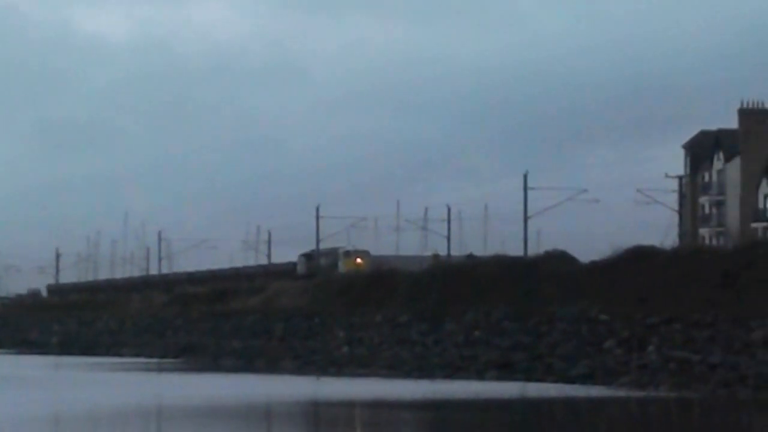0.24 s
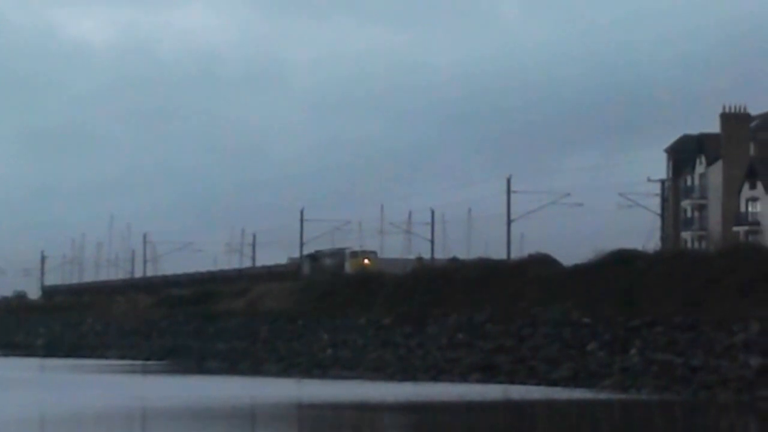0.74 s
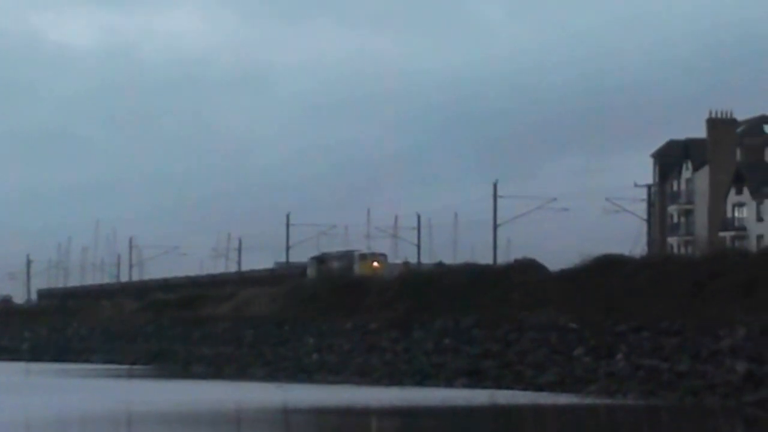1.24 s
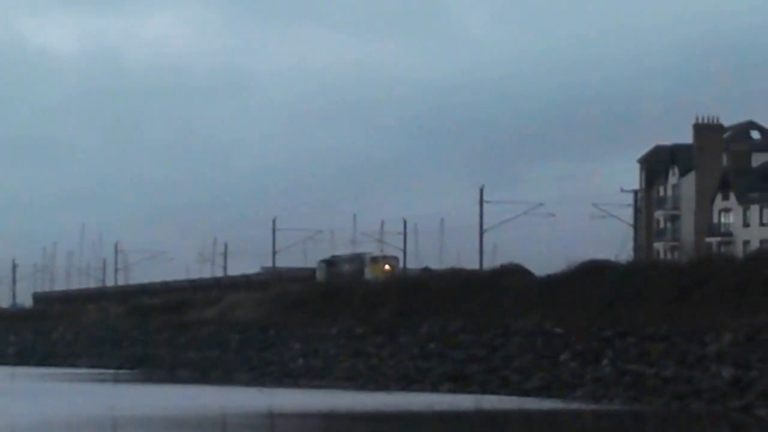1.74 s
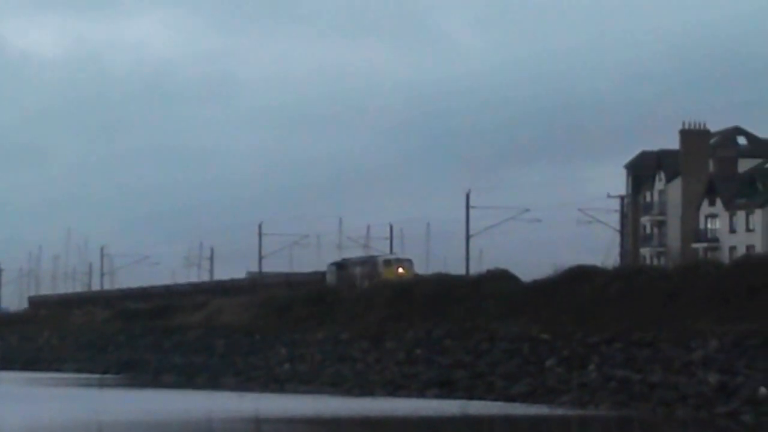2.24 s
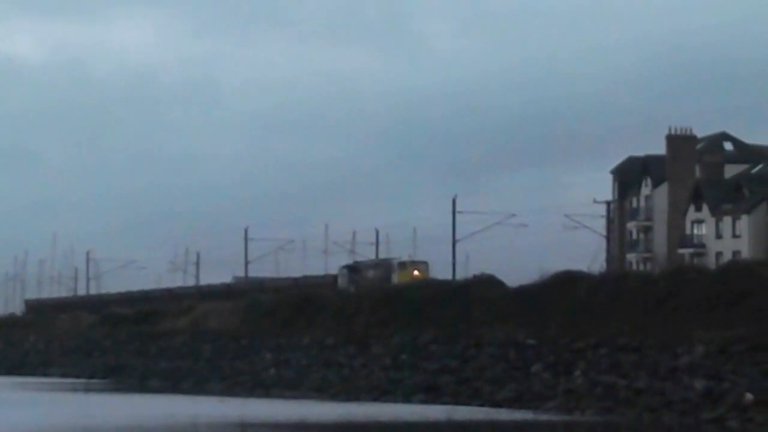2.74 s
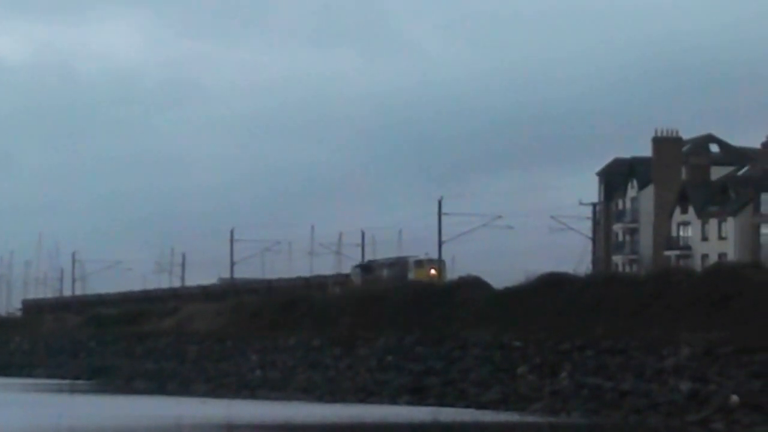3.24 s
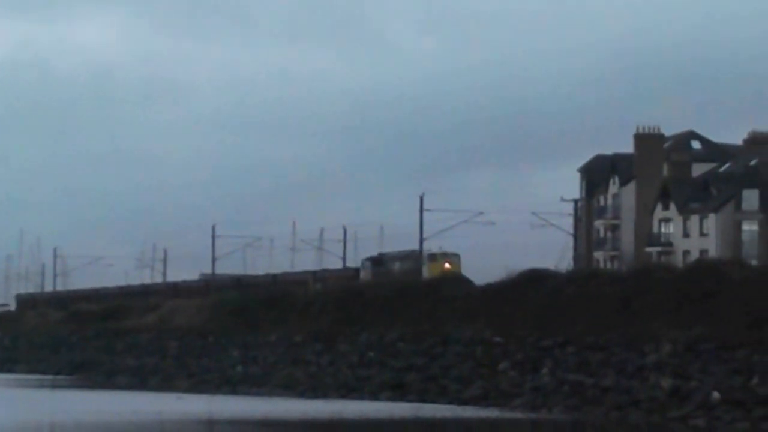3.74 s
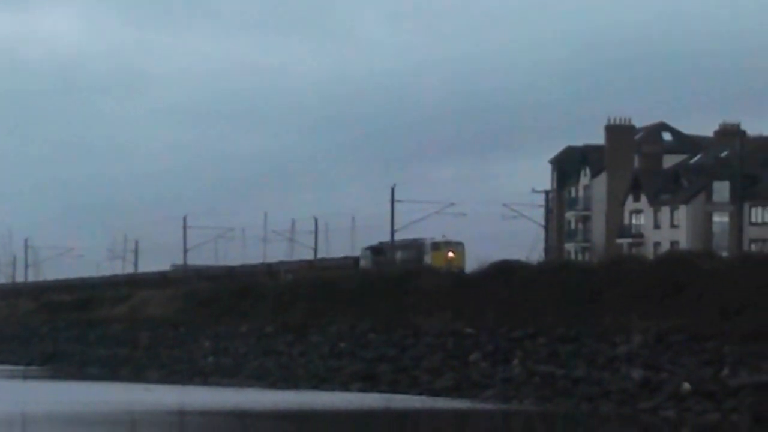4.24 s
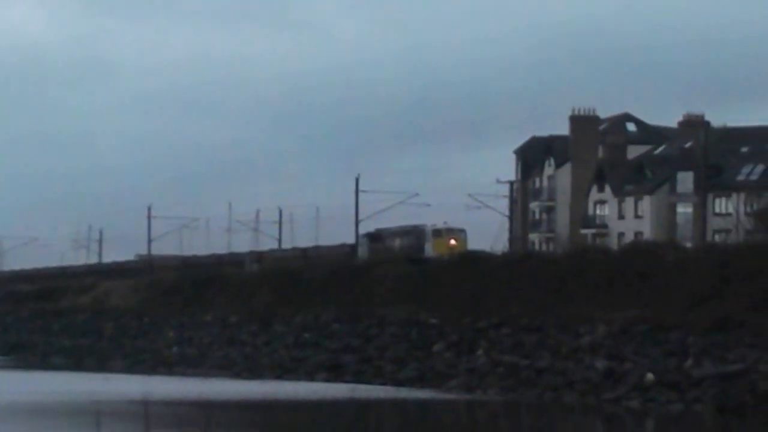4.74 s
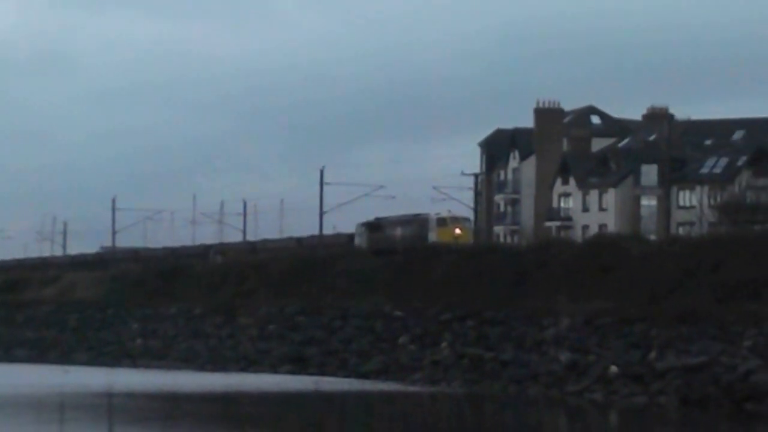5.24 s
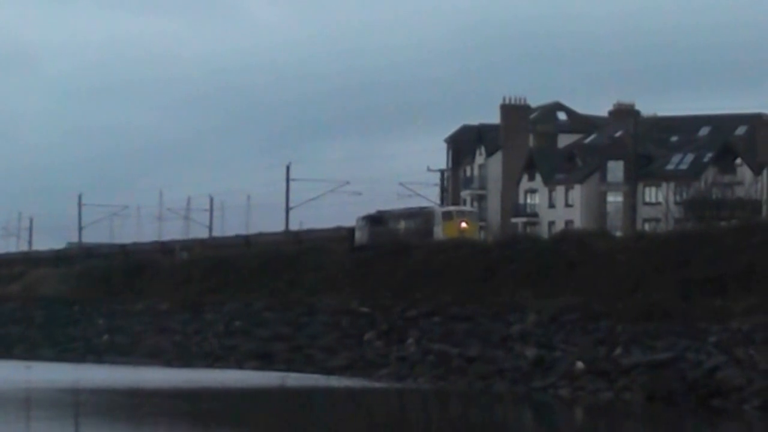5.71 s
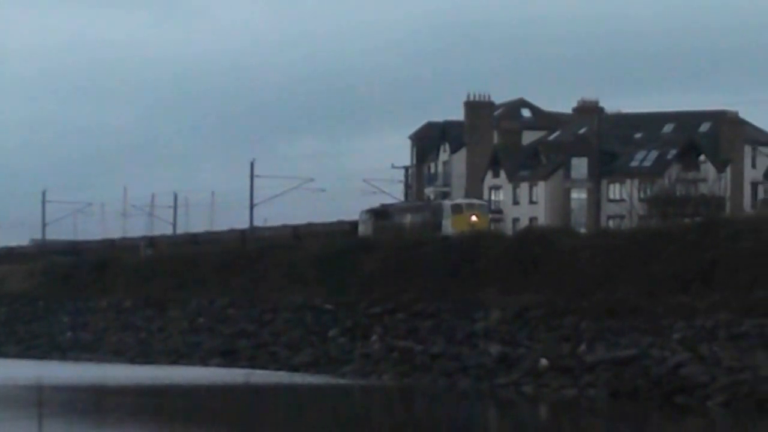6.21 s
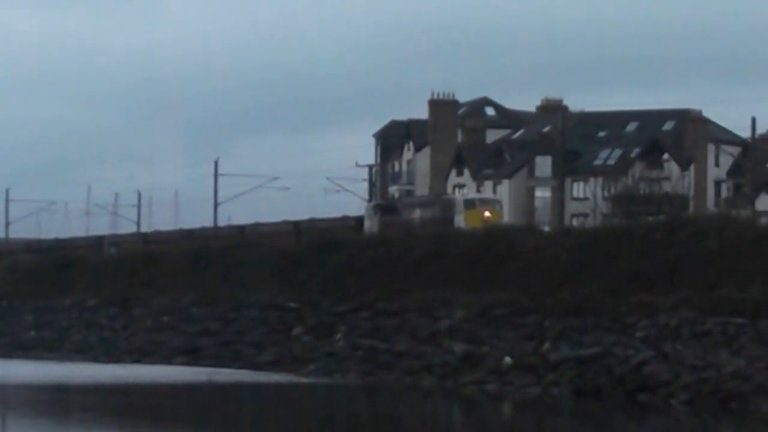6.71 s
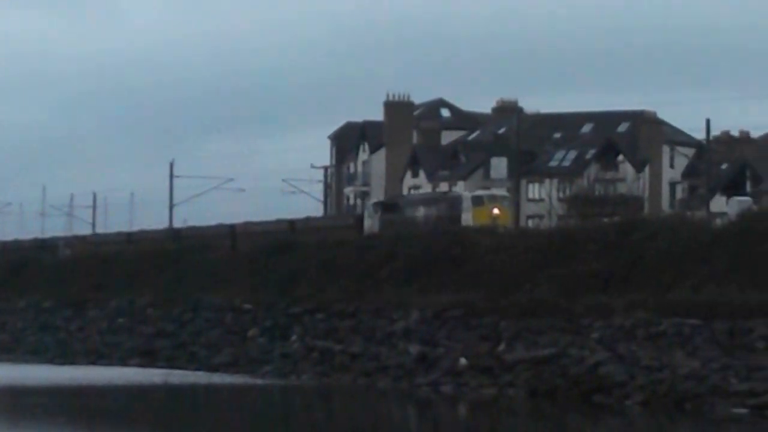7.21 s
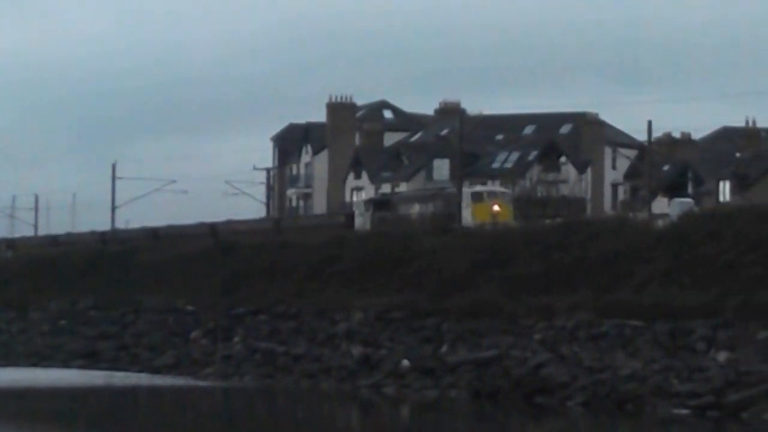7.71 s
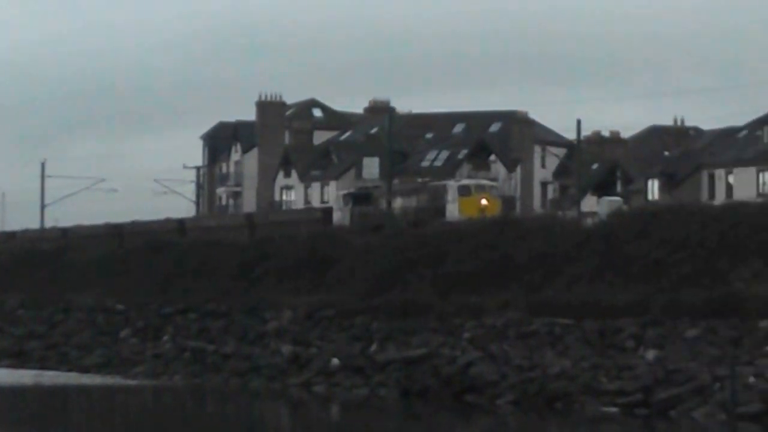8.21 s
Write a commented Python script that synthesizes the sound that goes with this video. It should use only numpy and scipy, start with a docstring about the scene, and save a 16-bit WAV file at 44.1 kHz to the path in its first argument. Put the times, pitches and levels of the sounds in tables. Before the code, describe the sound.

A hard-working diesel locomotive booms and throbs as it draws nearer, its wheels roaring and hissing on the rails.

```python
"""Diesel freight train approaching

A locomotive at full power hauls freight along an embankment, heard across water. Its exhaust throbs once a
crank turn and booms near 141 Hz; fan and gears whine over the roar of the wheels. The boom fades briefly near
7.2 s, then returns and overloads the microphone."""
import sys
import numpy as np
from scipy import signal
from scipy.io import wavfile
from scipy.ndimage import uniform_filter1d, minimum_filter1d

SR = 44100
rng = np.random.default_rng(int(sys.argv[2]) if len(sys.argv) > 2 else 0)


def file_out(sig):
    """Save sig as 16-bit WAV at sys.argv[1]."""
    # one column per channel
    cols = np.atleast_2d(sig).T
    # limit, then scale
    lim = np.clip(cols, -1, 1)
    pcm = np.round(lim * 32767).astype(np.int16)
    wavfile.write(sys.argv[1], SR, pcm)


N = 373086
TIME = np.arange(N) / SR
FAR = np.maximum(1 - TIME / 4.0, 0)  # 1 at the start, 0 from 4 s on

# crank speed as heard, sinking as the engine draws level: t/s, f/Hz
CRANK_SPEED = [(0, 15.735), (5.6, 15.735), (6.5, 15.7), (8.46, 15.69)]
# exhaust boom, brief dip near 7.2 s: t/s, level/dB
BOOM_LEVEL = [(0.05, -17), (0.42, -9.5), (0.98, -16), (1.4, -12.5), (2.7, -14.5), (3.05, -14.5), (3.7, -14),
              (4.25, -11), (5.3, -10.5), (6.55, -7.5), (6.85, -13), (7.17, -26.5), (7.4, -15.5),
              (7.62, -6.5), (7.95, -4), (8.25, -7)]
# engine roar: t/s, relative level/dB
ROAR_LEVEL = [(0.2, -37.5), (0.9, -37), (1.8, -36), (5.6, -35), (7.4, -33), (8.2, -27.5)]


def gain(db):
    """dB to amplitude."""
    return 10 ** (np.asarray(db) / 20)


def unit_rms(x):
    """Scale to rms 1."""
    return x / np.sqrt(np.mean(x ** 2) + 1e-20)


def curve(rows):
    """Interpolate (t/s, value) rows per sample."""
    return np.interp(TIME, *np.transpose(rows))


def swell(at_s, half_s):
    """Gaussian bump, peak 1."""
    return np.exp(-((TIME - at_s) / half_s) ** 2)


def wander(max_hz):
    """Slow random drift, rms 1."""
    t = np.linspace(0, TIME[-1], 1500)
    rates_hz = max_hz * np.geomspace(.1, 1, 24)
    drift = sum(np.sin(2 * np.pi * (hz * t + rng.random())) / hz ** .25 for hz in rates_hz)
    return np.interp(TIME, t, unit_rms(drift))


def noise(spectrum, patchy_db):
    """Noise of rms 1 from (f/Hz, level/dB) rows; moving air swells and fades patches of it."""
    bins_hz = np.fft.rfftfreq(4096, 1 / SR)
    real, imag, patches = rng.standard_normal((3, N // 1024 + 3, len(bins_hz)))
    patches = uniform_filter1d(patches, size=6, axis=0)
    patches = unit_rms(uniform_filter1d(patches, size=50, axis=1))
    hz, db = np.transpose(spectrum)
    shape_db = np.interp(np.log(bins_hz + 1), np.log(hz), db, right=-np.inf)
    frames = (real + 1j * imag) * gain(shape_db + patchy_db * patches)
    return unit_rms(signal.istft(frames.T, nperseg=4096, noverlap=3072)[1][:N])


def engine_tone(hz, level_db, fading_db, waver_rad):
    """Tone tracking the crank speed; turbulence shakes level and phase."""
    speed_hz = curve(CRANK_SPEED)
    clock_s = np.cumsum(speed_hz / speed_hz[0]) / SR
    amplitude = np.sqrt(2) * gain(level_db + fading_db * wander(9.9))
    return amplitude * np.cos(2 * np.pi * hz * clock_s + waver_rad * wander(14))


def crank_turns():
    """Crank angle in turns, slightly unsteady."""
    return .13 + np.cumsum(curve(CRANK_SPEED)) / SR + 0.00098 * wander(2.1)


def exhaust(turns, weak_db=-12, flutter_db=0.66, drift_db=1.0, bank_lead_cycles=0.19):
    """Uneven firings: a drone of crank orders that follow the boom, one throb a turn."""
    # exhaust spectrum, levels used for the weak orders: order, relative level/dB
    orders = [(1, -25), (2, -26), (3, -18), (4, -21), (5, -26), (6, -7), (7, -14), (8, -5), (9, 0),
              (10, -8), (11, -21), (12, -26), (13, -34), (14, -33), (15, -32), (16, -29), (17, -32)]
    # strong orders: order, level/dB re mean boom, share of the boom's swing
    strong_orders = [(6, -5, 0.039), (8, -5.5, 0.47), (9, 0.54, 0.96), (10, -5.5, 0.2)]
    # fades as the path across the water changes: order, t/s, half length/s, depth/dB
    path_fades = [(6, 0.69, .2, 3.5), (6, 3.3, 0.82, 4.5), (6, 6.15, 0.44, 4.5), (8, 7.38, 0.2, 12),
                  (10, 4, 1.4, 5.5), (10, 7.45, 0.16, 0.5)]
    # boost as the stack comes into the open: order, gain/dB
    open_boosts = [(6, 5), (7, 6.5), (8, 1.5), (9, 1.5), (10, 1.5), (11, 9), (12, 12), (14, 10)]
    boom_db = curve(BOOM_LEVEL)
    swing_db = boom_db - boom_db.mean()
    strong_db = {k: boom_db.mean() + db + share * swing_db for k, db, share in strong_orders}
    in_open = np.interp(TIME, [7.35, 7.75], [0, 1])
    out = np.zeros(N)
    for k, db in orders:
        fade_db = sum(depth * swell(s, half) for order, s, half, depth in path_fades if order == k)
        boost_db = dict(open_boosts).get(k, 0) * in_open
        level_db = strong_db.get(k, db + weak_db + 0.14 * swing_db) + boost_db - fade_db
        level_db += flutter_db * wander(9) + drift_db * wander(2)
        # orders 1, 2, 4, 5, below the pipe resonance, oppose the rest: a rounder throb
        sign = 1 if k in (1, 2, 4, 5) else -1
        cycles = k * turns + bank_lead_cycles * (k % 2 == 0)  # two cylinder banks: even orders lead
        out += sign * gain(level_db) * np.sqrt(2) * np.sin(2 * np.pi * cycles)
    return out


def clatter(turns, base_db=-46, fall_db_per_order=1.1, fading_db=3):
    """Weak high firing orders grow with the engine roar, fading in and out."""
    roar_db = curve(ROAR_LEVEL)
    trend_db = base_db + roar_db - roar_db.mean()
    out = np.zeros(N)
    for k in range(19, 44):
        level_db = trend_db - fall_db_per_order * (k - 18) + fading_db * wander(2)
        out += gain(level_db) * np.cos(2 * np.pi * (k * turns + rng.random()))
    return out


def rumble(mean_db=-25.5, follow=0.9):
    """Turbulent gas resonates in the exhaust pipe, following the boom."""
    # gas noise spectrum: f/Hz, level/dB
    spectrum = [(5, -4.5), (20, -5.5), (32, -5), (45, -11), (70, -12), (84, -5), (92, 1.5), (110, -9),
                (135, 6.5), (150, 3.5), (168, -10.5), (200, -25), (300, -32.5), (600, -62.5)]
    boom_db = curve(BOOM_LEVEL)
    return gain(mean_db + follow * (boom_db - boom_db.mean())) * noise(spectrum, patchy_db=1)


def fan(blade_hz=282.15, drift_db=1.0):
    """Cooling fan: the first three blade-rate harmonics swell and dip."""
    # fan tones: harmonic, near level/dB, change when far/dB
    harmonics = [(1, -38.5, 3), (2, -37.5, -1), (3, -42.5, -19.5)]
    # swells and dips: harmonic, t/s, half length/s, gain/dB
    swells = [(1, 1.35, 0.27, 3.5), (1, 1.83, .12, -6), (1, 2.38, .28, 6), (1, 3.2, .27, 9),
              (1, 3.8, 0.19, 5.5), (1, 7.22, .2, 12.5), (2, 2, 0.61, 5), (2, 5.4, 0.56, 3.5),
              (2, 7.0, 0.61, -7), (2, 8.2, 0.11, 7), (3, 4.42, .13, 4.5), (3, 5.5, 0.95, -3.5),
              (3, 6.85, .25, 7), (3, 7.6, .25, -4)]
    out = np.zeros(N)
    for k, near_db, far_db in harmonics:
        swell_db = sum(db * swell(s, half) for harmonic, s, half, db in swells if harmonic == k)
        level_db = near_db + far_db * FAR + swell_db + drift_db * wander(2)
        out += engine_tone(k * blade_hz, level_db, fading_db=1.6, waver_rad=0.06)
    return out


def whine(near_db=-42, far_change_db=-20.5):
    """Fan and gear whine grows on approach and dips as the engine draws level."""
    # whining tones, the fan's fourth harmonic near 1130 Hz and three gear tones: f/Hz, level/dB re whine
    tones = [(1129.5, -8.5), (1243.2, -0.5), (1777, -12), (2486, -13)]
    whine_db = near_db + far_change_db * FAR ** 1.2 - 8 * swell(7.8, .3)
    return sum(engine_tone(hz, db + whine_db, fading_db=1.0, waver_rad=0.72) for hz, db in tones)


def pumps(far_change_db=-4):
    """Pumps and blowers hum, fainter when far."""
    # pump and blower tones: f/Hz, near level/dB
    tones = [(250, -49), (361.8, -44), (409, -46), (424.5, -50.5), (488, -48.5)]
    distance_db = far_change_db * FAR
    return sum(engine_tone(hz, db + distance_db, fading_db=1.5, waver_rad=0.18) for hz, db in tones)


def intake(level_db=-44, hz=1600):
    """Steady rush of intake air."""
    # rush spectrum: f/Hz, level/dB
    spectrum = [(hz / 2, -25), (.8 * hz, -3), (hz, 0), (1.17 * hz, -4), (1.5 * hz, -25), (3 * hz, -60)]
    return gain(level_db) * noise(spectrum, patchy_db=0)


def engine_roar(turns, throb=0.065, trim_db=3.5):
    """Broad engine noise, pulsing once a crank turn."""
    # roar spectrum: f/Hz, level/dB
    spectrum = [(120, -32), (210, 2.5), (300, 3), (400, -1), (460, -1), (560, 4), (700, -2.5), (850, -6),
                (1200, -9), (1650, -11.5), (2100, -16), (2800, -29), (6000, -68)]
    pulse = 1 + throb * np.cos(2 * np.pi * turns)
    return gain(curve(ROAR_LEVEL) + trim_db) * noise(spectrum, patchy_db=0.6) * pulse


def wheels(roar_trim_db=-0.5, ring_db_per_s=1.2257, hiss_db_per_s=1.7641):
    """Wheels roar and ring, rails hiss; all grow on approach."""
    # wheel roar: t/s, relative level/dB
    roar_level = [(0.1, -43), (2.3, -41.5), (3.4, -36.5), (3.85, -34.5), (5.05, -33), (5.55, -36),
                  (6.1, -32.6), (6.45, -27.5), (7.05, -27.5), (7.75, -29.5), (8.1, -25.5), (8.4, -29)]
    # spectra of wheel roar, wheel ring and rail hiss: f/Hz, level/dB
    roar_spectrum = [(450, -30.5), (700, -3.5), (820, 2.5), (1000, 5), (1250, 3), (1350, -7.5),
                     (1800, -20.5), (2200, -26.5), (3700, -38), (8000, -68.5)]
    ring_spectrum = [(1000, -26), (1650, -6), (2200, -7.5), (2370, 0.5), (2500, 0), (2720, -11), (2950, -7),
                     (3220, -6), (3500, -16.5), (3750, -24.5), (7000, -66)]
    hiss_spectrum = [(1500, -21), (2500, 4), (3300, 2), (3750, -2), (4100, 1), (5000, -0.5), (5600, -0.5),
                     (6700, -5), (7500, -13.5), (8300, -19), (9000, -20), (11000, -49)]
    # wheel-on-rail surges: t/s, half length/s, ring gain/dB, hiss gain/dB
    surges = [(0.203, 0.26, 0.5, 4), (1.1, .4, 5, 3.5), (3.203, 0.24, -3.5, -3), (3.847, 0.19, 4.5, 2),
              (4.633, 0.14, 1.5, 4.5), (6.023, 0.094, 2, 4.5), (6.78, 0.19, 4.5, 0.5), (7.435, .28, 3.5, 4)]
    ring_surge_db = sum(db * swell(s, half) for s, half, db, _ in surges)
    hiss_surge_db = sum(db * swell(s, half) for s, half, _, db in surges)
    roar = gain(curve(roar_level) + roar_trim_db) * noise(roar_spectrum, patchy_db=0.9)
    ring = gain(-49 + ring_db_per_s * TIME + ring_surge_db) * noise(ring_spectrum, patchy_db=1.15)
    hiss = gain(-56.5 + hiss_db_per_s * TIME + hiss_surge_db) * noise(hiss_spectrum, patchy_db=1.4)
    return roar + ring + hiss


def wind(base_db=-33):
    """Light wind buffets the microphone in the deep bass."""
    # gusts: t/s, half length/s, gain/dB
    gusts = [(0.394, 0.87, 8.5), (6.596, 1.1, 12.5)]
    # buffeting spectrum: f/Hz, level/dB
    spectrum = [(5, -2), (20, -1.5), (40, -2.5), (65, -2), (100, -7), (200, -29.5)]
    gust_db = sum(db * swell(s, half) for s, half, db in gusts)
    return gain(base_db + gust_db) * noise(spectrum, patchy_db=2.5)


def crackle(limited, drive, crest_db=-25, tick_trim_db=9.5, ring_hz=9000):
    """Overload: single ticks at set times; under sustained drive, many crests near full scale tick."""
    # overload ticks on hard early beats: t/s, relative level/dB
    early_ticks = [(1.3843, -33), (4.2463, -31), (4.255, -33), (4.6294, -33), (4.6882, -31.5),
                   (4.8828, -32), (5.0699, -35.5), (5.642, -34), (6.2854, -33.5), (6.4058, -29.5),
                   (6.4184, -35), (6.5435, -38.5), (6.7575, -36), (6.8853, -32)]
    overloaded = uniform_filter1d(drive ** 2, size=11200) > .31
    onsets = np.diff(1. * (abs(limited) > .88), prepend=0) > 0
    isolated = uniform_filter1d(1. * onsets, size=61, origin=30) < 1.5 / 61  # no other in last 1.4 ms
    ticking = overloaded & onsets & isolated & (rng.random(N) < .65)
    ticks = ticking * np.sign(limited) * gain(crest_db + 2.4 * rng.standard_normal(N))
    for s, db in early_ticks:
        ticks[round(s * SR)] += gain(db + tick_trim_db)
    thin = signal.lfilter([1, -.15], [1], ticks)
    return thin + .9 * signal.lfilter(*signal.iirpeak(ring_hz, Q=6, fs=SR), thin)


def squeak(at_s=3.24, half_s=0.0064, hz=3830, rise_hz_per_s=12000, peak_db=-47):
    """One faint, short rising squeak."""
    t = TIME - at_s
    cycles = hz * t + rise_hz_per_s / 2 * t ** 2
    return gain(peak_db) * swell(at_s, half_s) * np.sin(2 * np.pi * cycles)


def scene():
    """Train and wind, mono."""
    turns = crank_turns()
    firing = exhaust(turns) + clatter(turns) + rumble()
    machinery = fan() + whine() + pumps() + intake()
    return (firing + machinery + engine_roar(turns) + wheels() + wind() + squeak())[None]


def record(dry, ceiling=.98, self_noise_db=-65, cutoff_hz=15750):
    """A fast limiter holds the boom near full scale; crackle, self-noise and a low-pass follow."""
    drive = dry[0]
    peak = -minimum_filter1d(-abs(drive), size=130)
    limited = drive / uniform_filter1d(np.maximum(peak / ceiling, 1), size=130)
    out = limited + crackle(limited, drive) + gain(self_noise_db) * rng.standard_normal(N)
    lowpass = signal.firwin(511, cutoff_hz, window=("kaiser", 9), fs=SR)
    return signal.oaconvolve(out, lowpass, "same")[None]


dry = scene()
out = record(dry)
file_out(out)
```